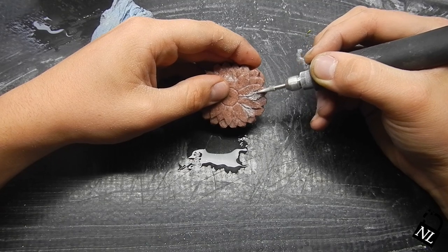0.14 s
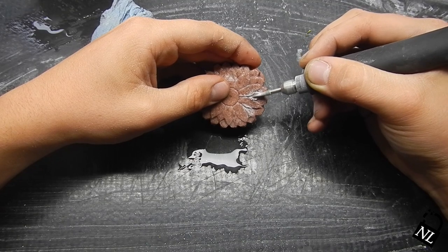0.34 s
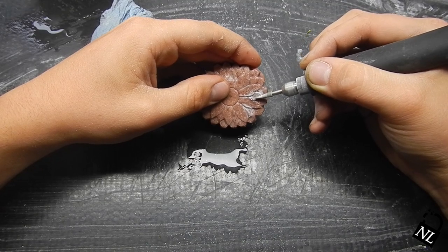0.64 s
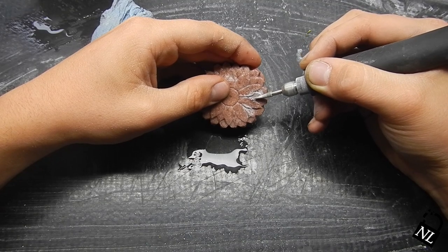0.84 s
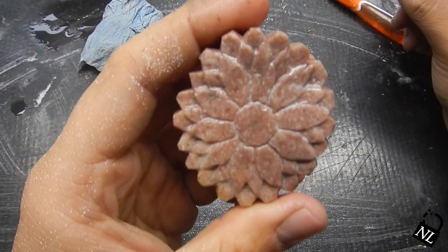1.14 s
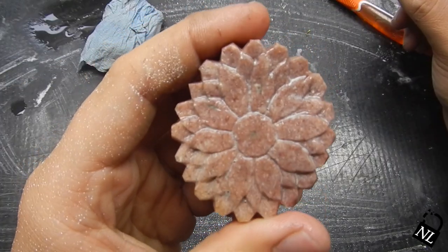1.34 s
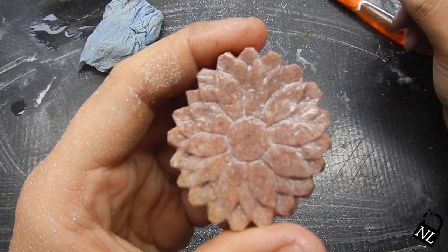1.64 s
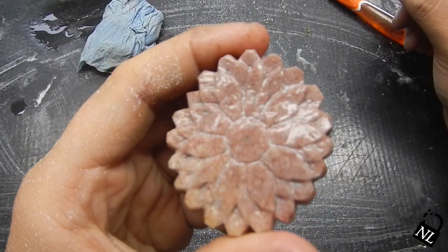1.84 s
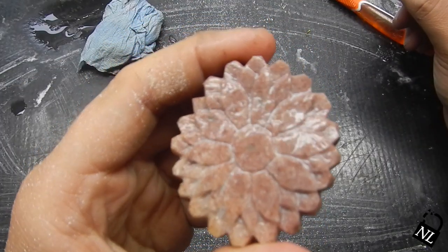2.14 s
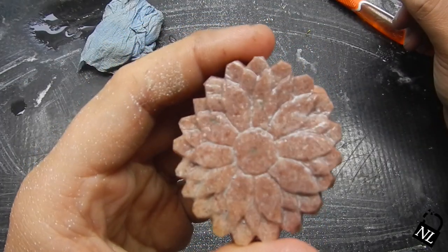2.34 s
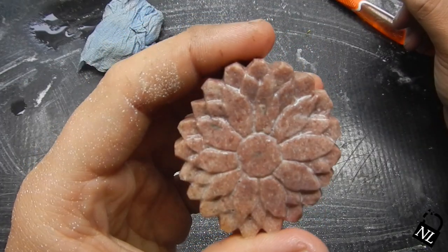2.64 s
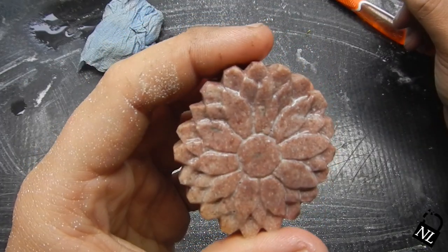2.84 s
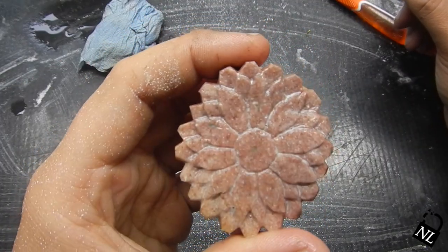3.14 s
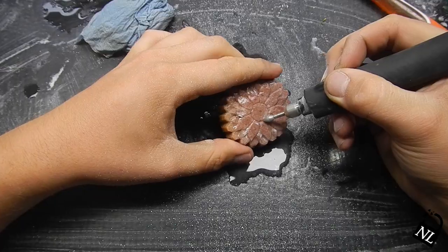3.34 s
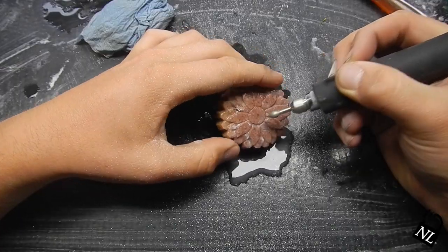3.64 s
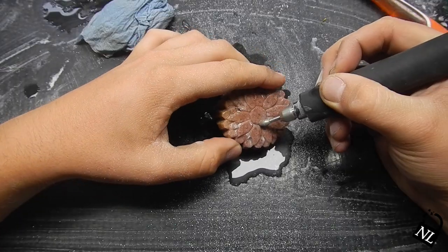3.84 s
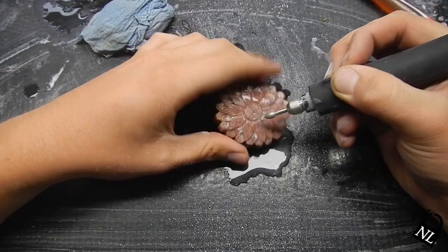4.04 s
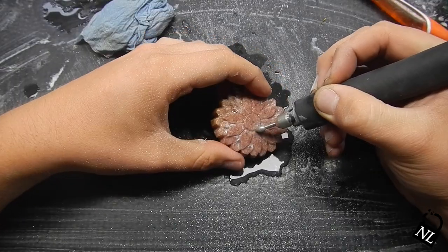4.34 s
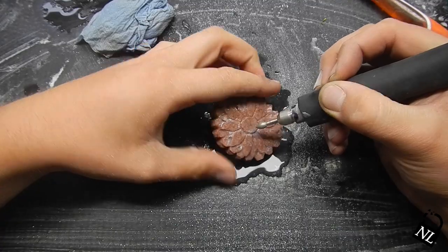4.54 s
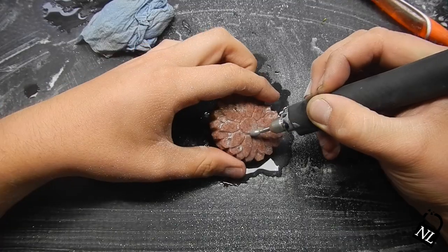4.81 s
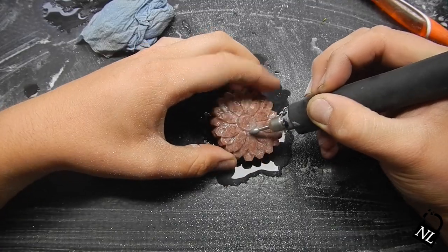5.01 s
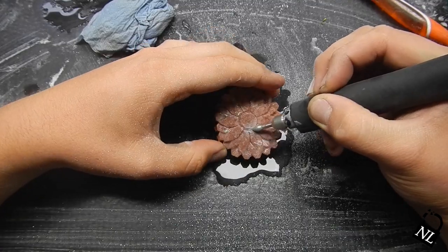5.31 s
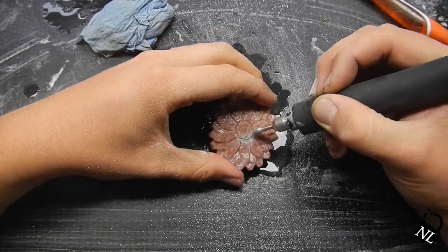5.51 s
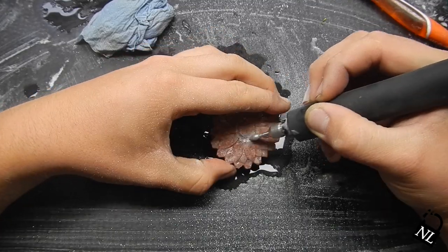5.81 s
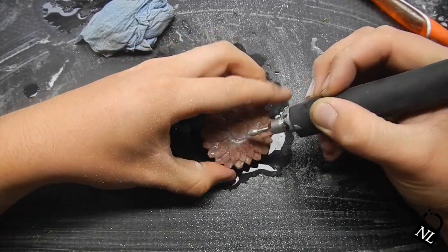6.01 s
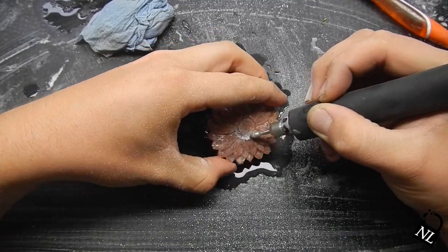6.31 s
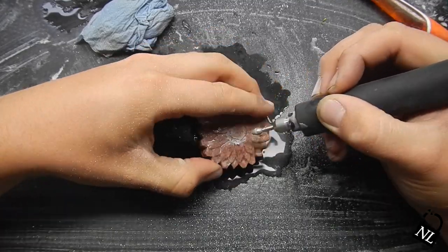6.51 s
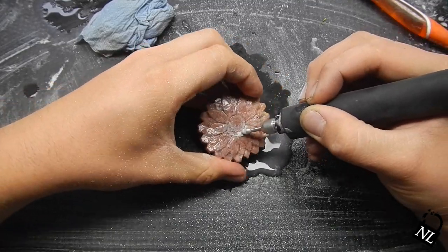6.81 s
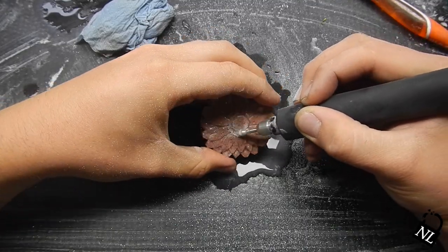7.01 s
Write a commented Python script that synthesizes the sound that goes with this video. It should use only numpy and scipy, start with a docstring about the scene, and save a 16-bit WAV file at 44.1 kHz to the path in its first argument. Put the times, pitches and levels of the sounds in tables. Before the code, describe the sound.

A handheld rotary tool whines steadily, its fine bit ringing on a small stone, then spins free and louder before rasping in uneven strokes.

```python
"""A rotary tool's fine bit cuts the edge of a small stone carving, close to a stereo microphone over a workbench.
It then runs free and louder, and at last is stroked over the wet face; each stroke slows the shaft.
Throughout, the shaft sings at some 570 turns a second as sines locked to its angle, and the motor whines.
Tiny random blows rattle the bearings in the housing and hiss as air; the casing rumbles as coloured noise.
In contact, chips timed by the shaft's angle strike the resonances of bit and stone."""
import sys
import numpy as np
from scipy import signal
from scipy.fft import rfft, irfft
from scipy.io import wavfile
from scipy.ndimage import uniform_filter1d

SR = 44100
rng = np.random.default_rng(int(sys.argv[2]) if len(sys.argv) > 2 else 0)


def file_out(sig):
    """Save sig as 16-bit WAV at sys.argv[1]."""
    # one column per channel
    cols = np.atleast_2d(sig).T
    # limit, then scale
    lim = np.clip(cols, -1, 1)
    pcm = np.round(lim * 32767).astype(np.int16)
    wavfile.write(sys.argv[1], SR, pcm)


N = 315756
T = np.arange(N) / SR
HZ = np.maximum(np.fft.rfftfreq(N, 1 / SR), 1)

# start and end in seconds of the edge cut, the free run and the strokes on the face
EDGE, FREE, FACE = (0, .975), (.99, 3.34), (3.345, 7.16)
# Broad colour of the rattling housing. Each row: frequency in Hz, relative level in dB.
RATTLE_COLOUR = [(300, -25), (480, -10.5), (750, -2.5), (1200, -3.5), (1800, -3.5), (2600, 0.5),
                 (3300, -2.5), (4400, -0.5), (5500, -3.5), (7000, -6.5), (8500, -20), (12000, -21)]


def undb(db):
    """Decibels to gain."""
    return 10 ** (np.asarray(db) / 20)


def unit(x):
    """Scale to rms 1."""
    return x / np.sqrt(np.mean(x ** 2))


def curves(*tables):
    """Join tables end to end and interpolate each column for every sample."""
    start_s, *columns = np.vstack(tables).T
    return [np.interp(T, start_s, column) for column in columns]


def during(span):
    """1 inside a span of time, 0 outside, with soft ends."""
    inside = 1. * (T >= span[0]) * (T < span[1])
    return uniform_filter1d(inside, size=400)


def staged(values):
    """One value on the edge, one running free, one on the face, for every sample."""
    stage = np.searchsorted([FREE[0], FACE[0]], T, side="right")
    return np.array(values)[stage]


def swell(start_s, length_s):
    """A rounded rise and fall from 0 to 1 and back."""
    return np.sin(np.pi * np.clip((T - start_s) / length_s, 0, 1))


def swells_db(rows):
    """Sum of rounded swells in dB from (start s, length s, dB) rows."""
    return sum(db * swell(start_s, length_s) for start_s, length_s, db in rows)


def bursts(rows):
    """Gain of rounded bursts from (start s, length s, dB) rows, a quarter length of skirt at each end."""
    return sum(undb(db) * swell(start_s - length_s / 4, 1.5 * length_s) for start_s, length_s, db in rows)


def walk(rate_per_s):
    """Smooth chance of spread 1 that changes about rate_per_s times a second."""
    points = rng.standard_normal(4096)
    hz = np.fft.rfftfreq(len(points), T[-1] / len(points))
    slow = unit(irfft(rfft(points) / (1 + (hz / rate_per_s) ** 4)))
    return np.interp(T, np.linspace(0, T[-1], len(slow)), slow)


def throb(per_s, depth, uneven=0.309):
    """Gain that dips again and again at an uneven pace."""
    pace_per_s = per_s * (1 + uneven * walk(per_s))
    phase = 2 * np.pi * (rng.random() + np.cumsum(pace_per_s) / SR)
    return 1 - np.clip(depth, 0, 1) * (.5 + .5 * np.cos(phase))


def colour(points):
    """Gain at every frequency from (Hz, dB) points, interpolated over log frequency."""
    hz, db = np.transpose(points)
    return undb(np.interp(np.log(HZ), np.log(hz), db))


def ring(modes):
    """Response of a body with a few damped resonances from (Hz, width Hz, dB) rows."""
    power = 0
    for hz, width_hz, db in modes:
        detuning = (HZ / hz - hz / HZ) * hz / width_hz
        power = power + undb(db) ** 2 / (1 + detuning ** 2)
    return np.sqrt(power)


def whir(x):
    """Narrow bands swell and fade on their own, so the colour keeps shifting."""
    spectrum = rfft(x)
    centres_hz = np.arange(1200, 8000, 400)
    shifting = 0
    for row in np.eye(len(centres_hz)):
        share = np.interp(HZ, centres_hz, row)
        shifting = shifting + irfft(spectrum * share, N) * undb(2 * walk(22))
    return shifting


def impacts(per_s, scatter_db):
    """Dense tiny blows of uneven size, as two trains: sum and difference at the microphones."""
    hit = rng.random(N) < per_s / SR
    size = undb(scatter_db * np.minimum(rng.exponential(size=N), 5))
    return hit * size * rng.standard_normal((2, N))


def radiate(push, response, slant_rad=0.26, pan_db=0.):
    """Sound two trains through a body; a part arrives at a slant and reaches the left microphone late."""
    # Stereo width of the sound by frequency. Each row: frequency in Hz, side minus mid in dB.
    stereo_width = [(60, 0), (150, -9.5), (450, -9), (750, -15.5), (1200, -13.5), (1900, -34), (2600, -10),
                    (4200, -5.5), (6500, -1), (8500, 2.5), (10500, 1.5), (12000, -1.5), (13600, -13),
                    (14900, 4.5)]
    # Stereo balance by frequency. Each row: frequency in Hz, left minus right in dB.
    stereo_balance = [(90, -3.5), (200, -1), (700, 0.5), (3200, -0.5), (4500, -1.5), (5200, -2), (6200, -3),
                      (7600, -2), (8700, 0), (10200, 0.5), (11700, 0.5), (13300, 7), (14400, -14.5),
                      (15700, -9)]
    mid, side = rfft(push) * response
    side = np.cos(slant_rad) * side - 1j * np.sin(slant_rad) * mid
    side = side * colour(stereo_width)
    lean = np.sqrt(colour(stereo_balance) * undb(pan_db))
    pair = np.array([(mid + side) * lean, (mid - side) / lean])
    return irfft(pair, N) / np.std(irfft(mid, N))


def tone(angle, flutter_db, wobble_rad, rate_per_s, lag_rad=0., pan_db=0.):
    """A line of rms 1 that flutters in level and phase; the left microphone lags."""
    phase = angle + wobble_rad * walk(rate_per_s)
    left = undb(pan_db / 2) * np.sin(phase - lag_rad)
    right = undb(-pan_db / 2) * np.sin(phase)
    return unit(np.array([left, right]) * undb(flutter_db * walk(rate_per_s)))


def strokes():
    """The hand leans in slowly and lifts quickly; the load takes speed from the shaft against its inertia."""
    # Strokes over the face, the first already under way. Each row: start in seconds, length in seconds, force 0-1.
    presses = [(3.07, .33, .42), (3.485, .19, .37), (3.76, .27, .63), (4.18, .35, .29), (4.59, .39, .34),
               (5.076, .36, 1), (5.612, .315, .99), (6.16, .28, .92), (6.807, .35, .91)]
    press_s, lift_s, inertia_s = .2, .04, .3
    load = 0
    for start_s, length_s, force in presses:
        lean_in = np.clip((T - start_s) / press_s, 0, 1)
        lift_off = np.clip(1 - (T - start_s - length_s) / lift_s, 0, 1)
        load = load + force * lean_in * lift_off
    step = 1 / (inertia_s * SR)
    sag_hz = 35.8 * signal.lfilter([step], [1, step - 1], load)
    return np.array([load, sag_hz]) * (T >= FACE[0])


def casing(level_db, jolt_db, sag_hz, shake):
    """The casing rumbles low in the hand, stronger in jolts; it falls less than the rattle as the shaft slows."""
    # Rumble colour. Each row: frequency in Hz, relative level in dB.
    rumble_colour = [(25, -27), (55, -27), (110, -15.5), (140, -9), (180, -6.5), (210, 5.5), (230, 3),
                     (260, -3.5), (340, -4.5), (500, -4), (900, -34)]
    # Level against the handpiece in dB: on the edge, running free, on the face.
    rumble_db = (-19.5, -22.5, -23.5)
    moving_db = 2.2 * jolt_db + 0.17 * sag_hz + 0.6 * shake + 1.2 * walk(16)
    noise = rng.standard_normal((2, N))
    return undb(level_db + staged(rumble_db) + moving_db) * radiate(noise, colour(rumble_colour))


def air(level_db, jolt_db, load, shake):
    """A fine hiss from the spinning collet that shakes with the bearings and fades slightly under load."""
    # Hiss colour. Each row: frequency in Hz, relative level in dB.
    hiss_colour = [(4000, -17.5), (7000, -0.5), (8500, -1), (10000, 3), (12200, 3.5), (13700, -0.5),
                   (15300, -15)]
    # Level against the handpiece in dB, before a 4 dB lift: on the edge, running free, on the face.
    hiss_db = (-4, -6, -7.5)
    gain = undb(level_db + staged(hiss_db) + 4.0 + 0.64 * jolt_db + 3.5 * load + 1.3 * shake)
    return gain * radiate(impacts(per_s=28000, scatter_db=-4.0), colour(hiss_colour))


def whine(angle, level_db):
    """The motor's eighteenth order pulses as the handpiece moves, and meets the microphones at changing angles."""
    # Level against the handpiece in dB: on the edge, running free, on the face.
    whine_db = (-8, -7, -2.5)
    # Swells as the handpiece tilts. Each row: start in seconds, length without skirts in seconds, level in dB.
    tilts = [(3.48, 0.036, -32), (3.587, 0.023, -32), (3.679, 0.038, -40), (4.615, 0.029, -35),
             (4.66, 0.028, -37), (4.785, 0.045, -34), (5.543, 0.064, -34), (6.193, 0.039, -34),
             (6.75, 0.049, -32), (6.83, 0.041, -32)]
    order = 18 * angle
    gain = undb(level_db + staged(whine_db))
    on_edge = gain * tone(order, flutter_db=3, wobble_rad=.25, rate_per_s=20, lag_rad=.8)
    free = gain * tone(order, flutter_db=2.0, wobble_rad=.4, rate_per_s=11, lag_rad=3.2)
    pulsing = gain * throb(per_s=9.5, depth=.85) + bursts(tilts)
    on_face = pulsing * tone(order, flutter_db=2, wobble_rad=.6, rate_per_s=30, lag_rad=1.52, pan_db=2.5)
    return on_edge * during(EDGE) + free * during(FREE) + on_face * during(FACE)


def shaft(angle, level_db, load, sag_hz):
    """Imbalance sings once a turn, with two overtones; contact with the stone unsettles all three."""
    # Levels against the handpiece in dB at 1, 2 and 3 times a turn: on the edge, running free, on the face.
    hum_db, octave_db, chatter_db = (-2, 2, 3.5), (-11, -6.2, -9), (-17.5, -9.5, -9.5)
    # The hum drops out as the bit digs in. Each row: start in seconds, length in seconds, depth in dB.
    hum_drops = [(0.092, 0.027, 7), (0.581, 0.027, 9), (0.647, 0.057, 4), (3.334, 0.083, 16),
                 (3.41, 0.047, 1.5), (3.58, 0.12, 6), (3.825, 0.088, 8), (3.877, .033, 8),
                 (4.019, 0.026, 8), (4.283, 0.055, 9), (4.306, 0.17, 5), (4.51, .06, 2), (4.702, 0.14, 8.5),
                 (5.273, 0.12, 32), (5.417, 0.042, 15), (5.485, .035, 24), (5.538, 0.032, 16),
                 (5.673, 0.04, 18), (5.852, 0.032, 17), (6.326, 0.08, 22), (6.417, 0.05, 21),
                 (7.02, 0.22, 29)]
    # The bit rides lightly and the octave sings out.
    # Each row: start in seconds, length without skirts in seconds, level in dB before a 0.5 dB cut.
    octave_notes = [(3.355, 0.055, -33), (3.525, 0.035, -39), (3.615, 0.045, -33.5), (3.735, .05, -37),
                    (3.825, 0.07, -34), (3.933, 0.038, -33), (4.005, .023, -37), (4.132, 0.032, -32),
                    (4.203, 0.07, -35), (4.32, 0.11, -37), (4.475, .045, -38), (4.582, .04, -32),
                    (4.93, 0.15, -34), (5.42, .035, -40), (5.665, .04, -39), (5.86, .045, -41),
                    (6.17, .11, -35), (6.325, .05, -40), (6.64, 0.15, -33.5), (6.81, 0.08, -37),
                    (6.92, .08, -36)]
    # The bit catches and chatters.
    # Each row: start in seconds, length without skirts in seconds, level in dB before a 2.5 dB lift.
    chatters = [(3.352, 0.013, -29), (3.4, 0.036, -31), (3.475, 0.031, -37), (3.65, 0.0084, -30),
                (4.06, 0.026, -33.5), (4.24, 0.046, -46), (4.33, 0.017, -42), (4.42, .025, -41),
                (4.478, 0.019, -34), (4.555, 0.03, -35.5), (4.685, 0.026, -41), (4.918, 0.026, -32.5),
                (5.025, 0.036, -37), (5.125, 0.025, -33), (5.22, .022, -44), (5.36, 0.046, -37),
                (5.62, 0.089, -40), (5.797, 0.049, -34), (5.868, 0.04, -31.5), (5.94, 0.065, -39),
                (6.082, 0.014, -30), (6.125, 0.036, -43), (6.345, 0.07, -38), (6.515, 0.032, -39),
                (6.645, 0.038, -37), (6.895, 0.022, -35)]
    contact = 1 - during(FREE)
    slowed_db = level_db - 0.24 * sag_hz  # hum and octave weaken as the shaft slows

    hum_throb = throb(per_s=17, depth=0.2 * load + .55 * during(EDGE))
    hum_gain = undb(slowed_db + staged(hum_db) - swells_db(hum_drops)) * hum_throb
    hum = hum_gain * tone(angle, flutter_db=.7 + .7 * contact, wobble_rad=.04 + .06 * contact,
                          rate_per_s=20, lag_rad=.2, pan_db=.6)

    octave_gain = undb(slowed_db + staged(octave_db)) * throb(per_s=7.5, depth=0.25 + .3 * contact)
    octave_gain = octave_gain + undb(-.5) * bursts(octave_notes)
    octave = octave_gain * tone(2 * angle, flutter_db=1.4, wobble_rad=.1 + .1 * contact,
                                rate_per_s=24, lag_rad=.15)

    chatter = undb(level_db + staged(chatter_db)) * tone(
        3 * angle, flutter_db=1.5 + .7 * contact, wobble_rad=.12 + .12 * contact, rate_per_s=20, lag_rad=.12)
    catches = undb(2.5) * bursts(chatters) * tone(
        3 * angle, flutter_db=1, wobble_rad=.12, rate_per_s=24, lag_rad=.12)
    # the bit bumps the stone at a changing point of the turn, so a weak hum stutters
    bumps = undb(-49) * contact * tone(angle, flutter_db=5, wobble_rad=1.6, rate_per_s=17, lag_rad=.3)
    return hum + octave + chatter + catches + bumps


def bearings(angle, shake):
    """Balls knock in their races, a little harder once a turn, and ring the housing; overtones ride on top."""
    # Housing resonances. Each row: frequency in Hz, width in Hz, relative level in dB.
    housing_modes = [(1610, 370, 2.5), (1997, 44, 3.5), (2280, 100, 1.5), (2500, 290, -4), (3470, 150, -15),
                     (3595, 270, 1.5)]
    # Overtones of shaft (whole numbers) and bearings.
    # Each row: multiple of shaft speed, level in dB on the edge, running free, on the face.
    overtones = [(2.29, -26, -17.5, -19), (3.875, -8.5, -7, -8.5), (4, -18.5, -30, -12), (5, -17, -19, -29),
                 (5.875, -16, -15, -30), (6, -6.5, -17, -14.5), (8, -15, -18.5, -39), (9, -30, -21, -39),
                 (11, -13, -21, -26)]
    balls = impacts(per_s=16000, scatter_db=1.3)
    knocks = balls * (1 + 0.03 * np.cos(angle)) * undb(.5 * shake)
    body = colour(RATTLE_COLOUR) * (1 + 1.17 * ring(housing_modes))
    rattle = undb(1.65 - 0.82 * during(FACE)) * whir(radiate(knocks, body))
    flutter_db = 4 - 2 * during(FREE)  # steadier when the bit runs free
    lines = 0
    for order, *stage_db in overtones:
        line = tone(order * angle, flutter_db, wobble_rad=.015 * order ** 2, rate_per_s=24, lag_rad=0.14)
        lines = lines + undb(staged(stage_db)) * line
    return rattle + lines


def grind(angle, bite, modes, span, runout, roam_db, scratch_db, pan_db, tilt_db=0):
    """Grit chips the stone, hardest on the bit's high side; resonances swell as the contact point roams."""
    pressure = np.exp(runout * np.cos(angle)) * undb(0.34 * walk(55))
    rung = 0
    for hz, width_hz, db, side_db in modes:
        chips = pressure * impacts(per_s=16000, scatter_db=0.5)
        edges_hz = [hz - width_hz / 2, hz + width_hz / 2]
        band = signal.butter(1, edges_hz, "bandpass", fs=SR, output="sos")
        octaves = np.log2(hz / modes[0][0])
        gain = undb(db + tilt_db * octaves + roam_db * walk(28))
        rung = rung + gain * undb([[0], [side_db]]) * signal.sosfilt(band, chips)
    # coarser chips shake the handpiece through the shank
    coarse = pressure * impacts(per_s=9000, scatter_db=1.5)
    scratch = undb(scratch_db) * radiate(coarse, colour(RATTLE_COLOUR))
    return (radiate(rung, 1, pan_db=pan_db) + scratch) * bite * during(span)


def edge_cut(angle):
    """Bit and stone ring together as deep as the bit cuts the edge."""
    # Ring on the edge. Each row: frequency in Hz, width in Hz, relative level in dB,
    # side minus mid in dB on top of the overall stereo width.
    edge_modes = [(1990, 370, -2, -2), (3400, 95, 0.5, -10), (4660, 70, 1, -8), (5430, 250, -2, 2.5),
                  (5740, 130, 1, -11), (6140, 120, 3.5, -3), (6340, 52, 6, -5)]
    # Depth of cut as ring level. Each row: time in seconds, level in dB before a 2.5 dB lift.
    cut_depth = [(0.0, -29), (0.126, -30.5), (0.224, -24.5), (0.552, -28.5), (0.564, -23.5), (0.648, -30),
                 (0.918, -25.5), (0.938, -33), (0.975, -25)]
    cut_db, = curves(cut_depth)
    return grind(angle, undb(cut_db + 2.5), edge_modes, EDGE, runout=1.0, roam_db=1.0,
                 scratch_db=-12.5, pan_db=-1.0)


def face_grind(angle, load, lift_db):
    """Strokes rasp over the face: bit and stone ring under load, and the slender bit sings in grooves."""
    # Joint ring of bit and stone, then the bit's own. Each row: frequency in Hz, width in Hz,
    # relative level in dB, side minus mid in dB on top of the overall stereo width.
    face_modes, bit_modes = [(1640, 240, 3.5, 1), (1970, 130, 6, -16), (2215, 39, 1.5, -18),
                             (4000, 630, -4, -18), (7650, 130, -7.5, -4), (7520, 930, -2.5, 2.5)], [(5600, 110, 4.5, -2), (6230, 170, 0, -9)]
    # The bit digs into a groove. Each row: start in seconds, length without skirts in seconds, level in dB.
    digs = [(3.62, .07, -39), (3.865, .055, -32), (4.27, .07, -40), (4.7, .06, -40), (4.88, .12, -37),
            (5.12, .05, -39), (5.185, .06, -33), (5.265, .05, -34), (5.33, .045, -33), (5.4, .045, -37),
            (5.76, .11, -39), (6.27, .05, -39), (6.34, .1, -36), (6.99, .05, -33)]
    graze_db = -2.5  # the resting bit
    bite = undb(-34 - 2 * lift_db + 2.4 * walk(23)) * np.sqrt(undb(graze_db) ** 2 + load)
    tilt_db = 2 * (load - 1.0)  # dB per octave: lighter strokes are duller
    rasp = grind(angle, bite, face_modes, FACE, runout=0.26, roam_db=1.5,
                 scratch_db=-5.5, pan_db=0.5, tilt_db=tilt_db)
    sing = grind(angle, undb(-9) * bite + bursts(digs), bit_modes, FACE, runout=.4, roam_db=1.5,
                 scratch_db=-22, pan_db=-0.9)
    return rasp + sing


def scene():
    """One shaft angle drives tones, rattle and cutting; strokes slow it, quiet the tool and deepen the bite."""
    # Shaft speed before strokes slow it, in turns a second: on the edge, running free, on the face.
    shaft_hz = (578.2, 568.4, 578.6)
    # Handpiece on the edge and running free, two tables. Each row: time in seconds, level in dB.
    held_levels = [
        [(0.0, -29.5), (0.332, -25.5), (0.43, -30), (0.582, -27.5), (0.606, -31.5), (0.846, -28.5),
         (0.975, -29.5)],
        [(0.99, -27), (1.29, -24.5), (1.42, -26.5), (1.59, -24.5), (2.39, -26), (2.39, -25), (3.3, -25)],
    ]
    # The handpiece jolts and rattles harder. Each row: start in seconds, length in seconds, rattle rise in dB.
    jolts = [(0.557, 0.033, 2.5), (1.264, .07, 2), (1.528, 0.23, 3), (1.813, 0.099, 2.9),
             (1.943, 0.12, 1.6), (2.217, 0.019, 3.5), (2.448, 0.025, 2.5), (2.662, 0.046, 2),
             (3.06, 0.05, 3.5), (3.297, 0.046, 4), (3.975, 0.04, 4), (4.11, 0.082, 1.5), (4.17, 0.11, 3),
             (4.464, .05, 0.5), (4.585, 0.066, 0.5), (4.913, 0.063, 1.5), (5.544, 0.077, 2.5),
             (5.83, .035, 6), (6.016, .06, 3.5), (6.188, 0.1, 1.5)]
    # The bit comes off the stone. Each row: start in seconds, length in seconds, rattle drop in dB.
    lifts = [(3.42, 0.048, 1.5), (4.018, .095, 2), (5.96, 0.046, 3), (6.44, 0.077, 3), (7.076, .06, 0.5)]
    # Rattle against the handpiece in dB: on the edge, running free, on the face.
    rattle_db = (-.5, -0.36, 0.5)
    load, sag_hz = strokes()
    speed_hz = staged(shaft_hz) - sag_hz + 0.433 * walk(9.8)
    angle = 2 * np.pi * np.cumsum(speed_hz) / SR
    jolt_db, lift_db = swells_db(jolts), swells_db(lifts)
    held_db, = curves(*held_levels)
    face_db = -28.5 - 4.5 * load - 0.2945 * sag_hz  # load and lost speed quiet the tool
    level_db = np.where(T < FACE[0], held_db, face_db)
    shake = walk(20.6)

    background = casing(level_db, jolt_db, sag_hz, shake) + air(level_db, jolt_db, load, shake)
    tones = whine(angle, level_db) + shaft(angle, level_db + 0.8 * jolt_db, load, sag_hz)
    rattle = undb(level_db + staged(rattle_db) + jolt_db - lift_db) * bearings(angle, shake)
    cutting = edge_cut(angle) + face_grind(angle, load, lift_db)
    return background + tones + rattle + cutting


def record(dry):
    """The recorder cuts the top steeply above 15750 Hz."""
    low_pass = signal.ellip(12, .1, 90, 15750, fs=SR, output="sos")  # .1 dB ripple, 90 dB stop
    return signal.sosfilt(low_pass, dry)


dry = scene()
out = record(dry)
file_out(out)
```